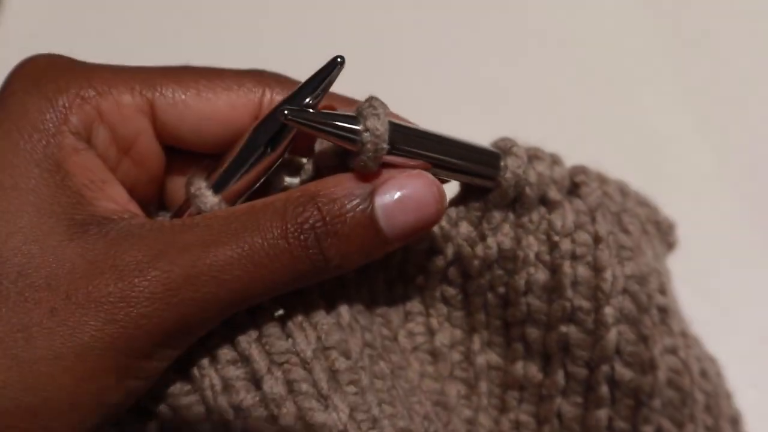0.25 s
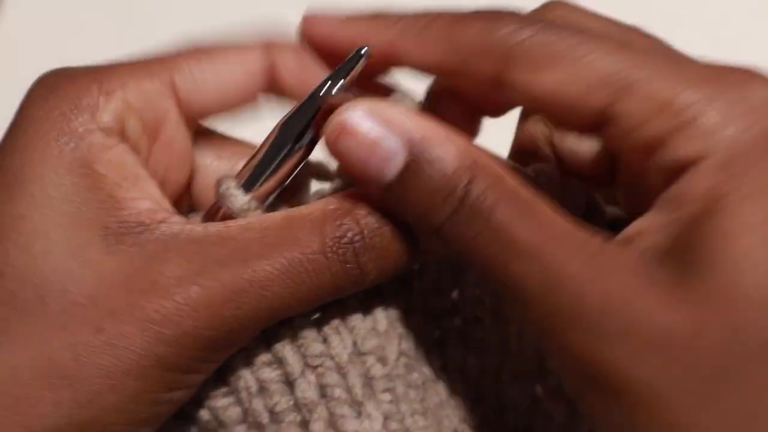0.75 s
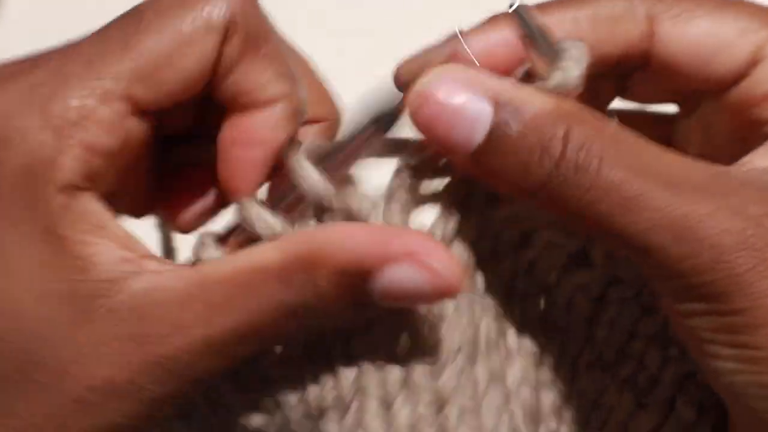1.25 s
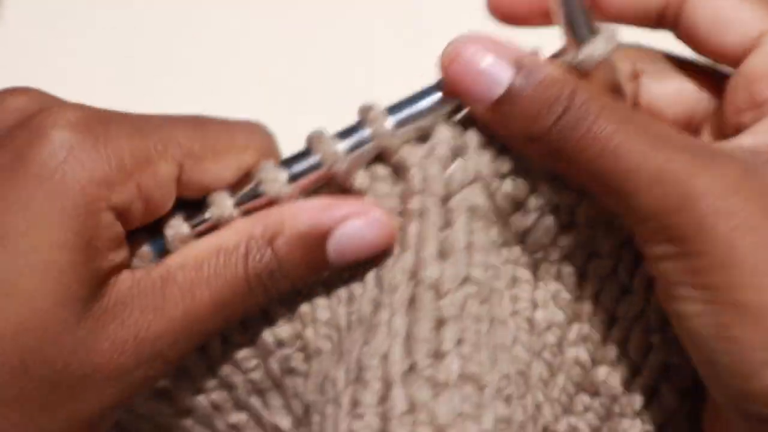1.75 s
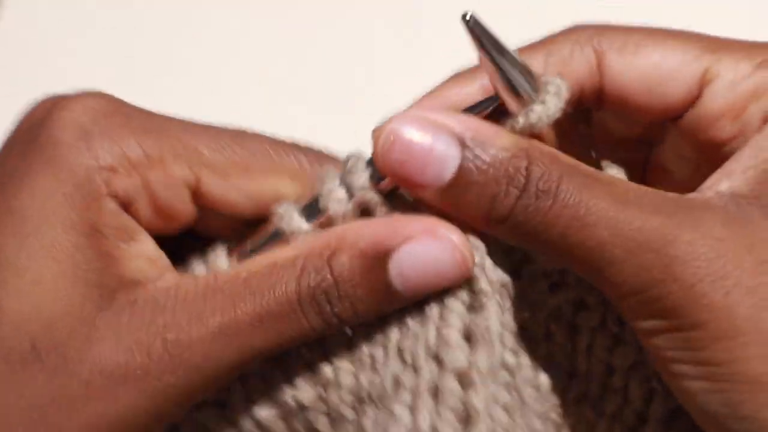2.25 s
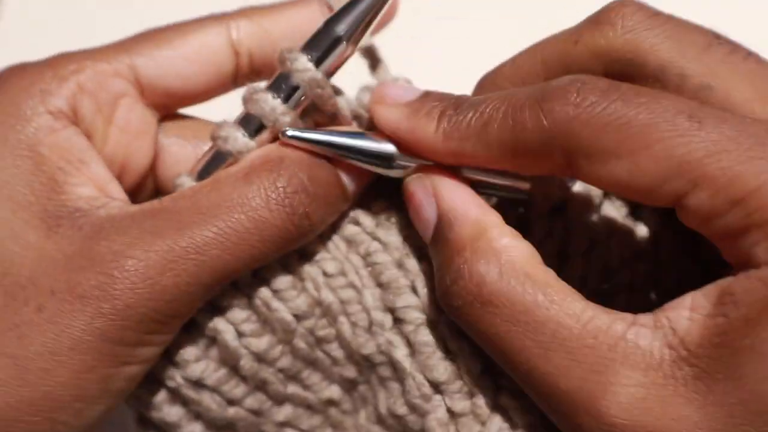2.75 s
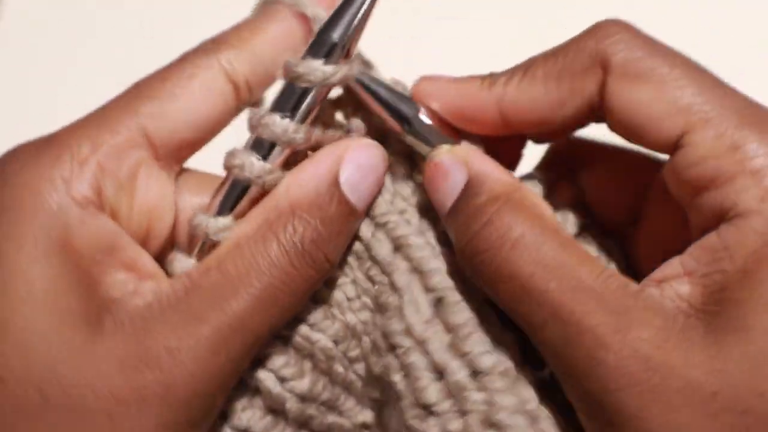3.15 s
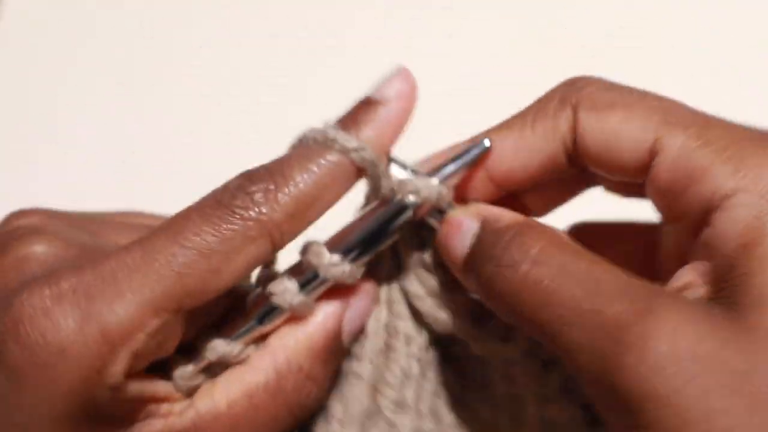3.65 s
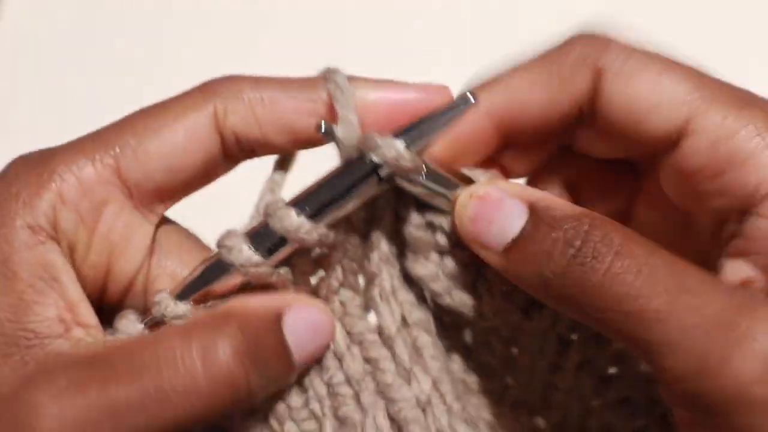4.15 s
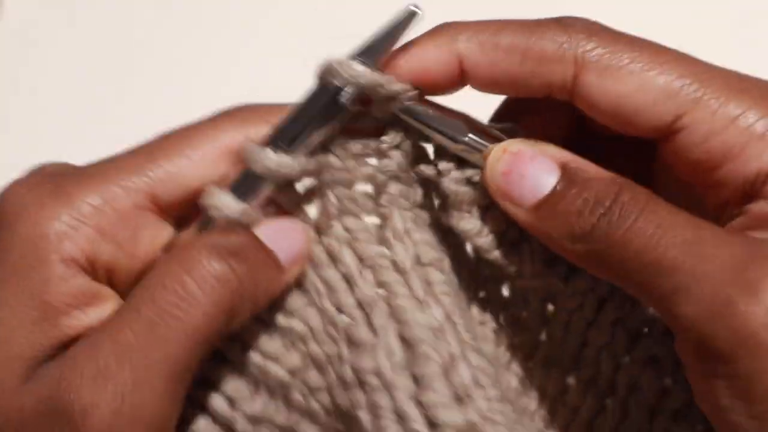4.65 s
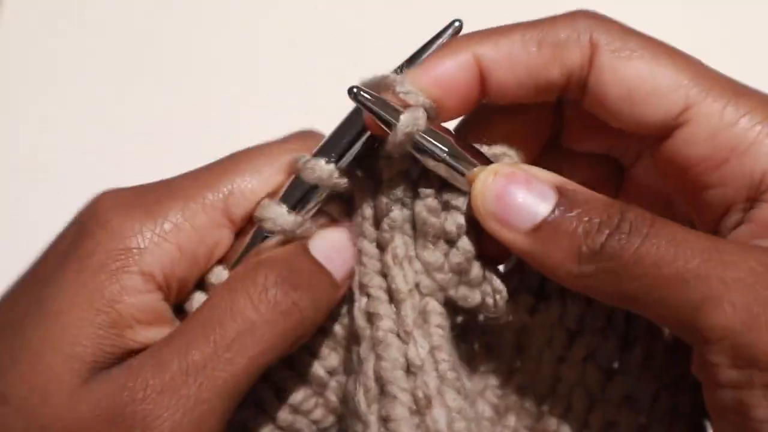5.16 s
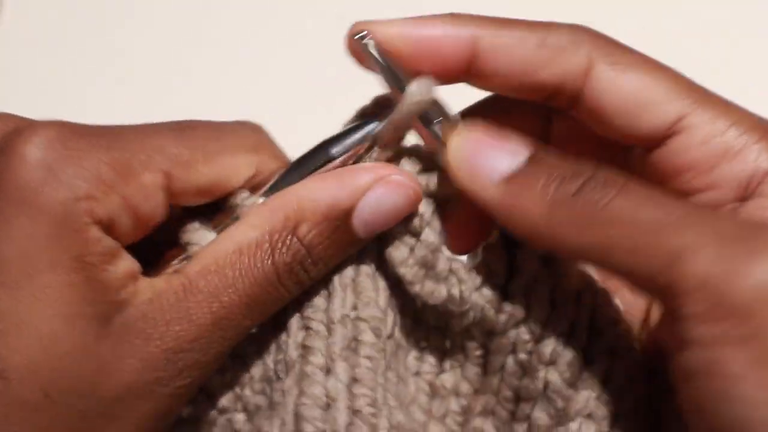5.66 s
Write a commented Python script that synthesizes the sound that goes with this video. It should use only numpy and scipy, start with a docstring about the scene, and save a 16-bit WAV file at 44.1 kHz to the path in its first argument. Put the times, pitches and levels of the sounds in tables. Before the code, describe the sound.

Dull, soft hand thumps and sparse, crisp metal needle clicks, with faint wool rustle, close up in a quiet room with low hiss.

```python
"""Two metal knitting needles cast off stitches, close to a microphone in a quiet room.
Needle contacts are snaps, chatter and damped rings, filtered, echoed by the table and answered by the room.
Hand movements are soft, dull thumps: low decaying pushes, a deep sway and a diffuse rumble.
Scuffs and rustling wool are shaped noise; a steady noise hiss and a low sine hum lie beneath."""
import sys
import numpy as np
from scipy import signal
from scipy.fft import rfft, irfft, next_fast_len
from scipy.io import wavfile
from scipy.ndimage import uniform_filter1d

SR = 44100
rng = np.random.default_rng(int(sys.argv[2]) if len(sys.argv) > 2 else 0)


def dump(signal):
    """Clip the signal to [-1, 1] and save it as 16-bit WAV at the path in sys.argv[1]."""
    limited = np.clip(np.atleast_2d(signal).T, -1, 1)
    pcm = np.round(limited * 32767).astype(np.int16)
    wavfile.write(sys.argv[1], SR, pcm)


N = 259797  # length in samples

# steady hiss: frequency_hz, relative_density_db
HISS_SPECTRUM = [(15, -41), (36, 0), (52, 10.5), (68, -2.5), (110, 1), (170, -8.5), (400, -10), (780, -9.5),
                 (1250, -1), (2400, 1), (4000, -1), (7000, -7.5), (12000, -17), (16000, -30.5)]
HISS_RMS_DB = -63
HUM_HZ, HUM_RMS_DB = 51.4, -87.5

# rustle of the wool fibres: frequency_hz, relative_density_db
WOOL_SPECTRUM = [(300, -15), (1200, -1.5), (3000, -1), (7000, -11), (11500, -17), (13500, -36),
                 (16000, -38)]
# rustle that grows as the knitting gets going: time_s, level_db
HANDLING_LEVELS = [(1.1, -103), (2.0, -71), (3.4, -68.5), (5.89, -64.5)]
# wool brushed by the hands: frequency_hz, relative_density_db
BRUSH_SPECTRUM = [(50, -40), (180, 7), (400, 2), (800, 0), (1800, -0.5), (4500, -13), (8000, -23),
                  (15000, -59)]
# the brush leads the thump and swells this many times slower; its tilt is in dB per octave
BRUSH_LEAD_S, BRUSH_SLOWER, BRUSH_TILT_DB = 0.014, 4.27, 2
# yarn rubs, slides and a needle scrape: strongest_s, level_db, half_length_s, tilt_db_per_octave
RUBS_AND_SLIDES = [(0.068, -64, 0.016, 1), (0.297, -55, 0.0061, 0), (1.201, -74, 0.031, 1),
                   (1.282, -62.5, 0.043, 1), (1.635, -66, 0.13, 5), (2.244, -65.5, 0.048, 3),
                   (3.805, -59, 0.016, -3), (4.325, -65.5, 0.027, 4), (5.316, -60.5, 0.024, 2.5),
                   (5.53, -74, 0.036, 9)]

# bumps of a finger or needle on the fabric: start_s, level_db, centre_hz, spread_octaves, swell_time_s
FABRIC_SCUFFS = [(.048, -61, 2100, 0.26, 0.011), (.066, -56, 480, 0.88, 0.015),
                 (1.123, -46.5, 330, 0.82, 0.021), (3.252, -69, 517, 1, .018),
                 (3.787, -52, 345, 0.62, 0.015), (3.851, -67, 520, .8, 0.014),
                 (5.711, -62.5, 650, 1.5, 0.013), (5.822, -58.5, 577, 0.88, 0.0078)]

# moves of the hands: start_s, level_db, pitch_hz, swell_time_s, change_per_settling_push_db,
# then re level: sway_db, rumble_db, rumble_tilt_db_per_octave, brush_db
HAND_THUMPS = [(.059, -37.5, 114, .011, -18, -7, -1, 3, -22.5),
               (.074, -33.5, 170, 0.0095, -26, -25, -11, -1, -35),
               (.109, -33, 164, 0.014, -30, -14, -20, -13, -29.5),
               (.134, -41.5, 100, .018, -20, -11, -6, -4, -35),
               (.298, -47.5, 127.5, 0.0092, -25, -19, -13.5, -1, -18.5),
               (.336, -55.5, 123, 0.0115, -10, -9, 2, -7, -27),
               (.440, -64.5, 105.5, 0.018, -2.5, 2, -0.5, 2.5, -24),
               (.955, -63.5, 121, .012, -16, -10, -7, -5, -25),
               (1.122, -24.5, 155, 0.012, -19, -45, -31, 1, -36.5),
               (1.143, -26.5, 172.6, .012, -11, -39, -6.5, 0.5, -37.5),
               (1.150, -34, 268.3, 0.013, -12, -35, -11, -6, -31),
               (1.180, -37, 137, 0.012, -9, -28, -6, 0, -25),
               (1.299, -44.5, 146, 0.0065, -25, -24, -21, 9, -23.5),
               (2.166, -64, 143, 0.014, -16, -6, -6.5, 2, -26),
               (2.595, -51, 123.3, 0.018, -3, -5, 1.5, -1.5, -15),
               (2.738, -57, 108, 0.014, -11, -11, 1, -2.5, -38),
               (2.803, -57.5, 111.4, .018, -8, -2, -1.5, -1, -38),
               (3.205, -53.5, 90, 0.02, -9, -1, 7, -13, -10.5),
               (3.252, -55, 130.6, 0.016, -6.5, 5, -1, 3, -15),
               (3.729, -62, 79.6, 0.034, -8, 0, -4, -7, -12),
               (3.782, -37, 117, 0.014, -14, -7, -17, 2, -25),
               (3.798, -38, 106, 0.0086, -14, -24, -11, 3.5, -26),
               (3.835, -45.5, 85, .014, -10, -4, -6, -5, -16.5),
               (3.993, -63.5, 89, 0.0083, -14, -0.5, -6, -10, -20),
               (4.275, -64, 116, 0.02, 4, 1, -1, 2, -8),
               (4.406, -33, 98.6, 0.023, -17, -10, -8, 0.5, -28.5),
               (4.998, -48.5, 83, 0.016, -2.5, 2.5, -2.5, 5, -11),
               (5.030, -45, 89.3, .016, -6, -10, -11, -7, -29), (5.226, -67, 79, 0.023, 0.5, 13, 5, -4, -2),
               (5.587, -41, 70.8, 0.021, -6.5, -14, -2, -3, -22.5),
               (5.821, -63, 147, 0.0085, -10, -2, 0, 2, -2)]
# rumble spectrum: multiple_of_pitch, relative_level_db
RUMBLE_SPECTRUM = [(.2, -26), (.5, -24), (.8, 1), (1, -1.5), (1.8, -14.5), (2.3, -19), (4, -29), (8, -44),
                   (20, -66), (80, -110)]
# hollow resonances of the table and room that colour every rumble: frequency_hz, gain_db
HOLLOW_RESONANCES = [(100, -1.5), (150, 1), (195, 0), (222, 6), (248, -4.5), (280, 5), (330, -3.5),
                     (375, 0.5), (420, -1.5), (465, -0.5), (700, -5)]
SWAY_HZ, SWAY_RISE_S = 56.3, 0.027  # deep sway of the whole piece
SETTLE_SWELLS, SETTLE_PITCH = 2.7, 0.928  # spacing of pushes in swell times; pitch ratio
OVERTONE, OVERTONE_DB = 1.38, -11  # multiple of the pitch; level re the first swing in a taut push
TAUT_HZ, OVERTONE_DB_PER_OCTAVE = 160.6, 16  # the overtone fades below the pitch of a taut push

# needle contacts: start_s, strength_db, lowest_hz, highest_hz, main_ring_db, chatter_t60_s, room_db,
# table_echo_ms, lower_tip_hz, upper_tip_hz, tip_height_db, tip_width_hz
NEEDLE_CONTACTS = [(0.297, -26, 695, 14000, -2, 0.012, -15, 0.83, 6500, 6870, 10, 900),
                   (0.2985, -18.5, 1180, 4000, 0, 0.02, -9, 0.73, 1380, 2500, 7, 620),
                   (0.7351, -13.5, 4120, 11100, -9.5, 0.005, -5.5, 1.6, 4770, 10650, 6, 750),
                   (2.9587, -22.5, 1410, 10800, -14, 0.0044, 0, 0.51, 2160, 5530, 11, 700),
                   (2.9674, -32, 1500, 11900, -12, 0.0038, -5, .55, 5500, 10200, 5, 900),
                   (2.9825, -17, 2900, 11700, -15, 0.0037, -8.5, 1.3, 4400, 10500, 2, 900),
                   (4.7021, -4.5, 1790, 13560, 7.5, 0.0034, -4.5, 0.76, 4020, 4800, 3, 420),
                   (5.141, -31, 1224, 5600, -12, .003, -13, 1.14, 2700, 3300, 9, 600),
                   (5.3200, -39, 700, 12900, 0, .0058, 2, 1, 2500, 5000, 3, 420)]
# bending modes of a needle held in wool and fingers: frequency_hz, relative_level_db, t60_s
NEEDLE_MODES = [(1750, 0, 0.013), (2520, -1.5, 0.011), (3530, 2, .01), (4210, 5, 0.013),
                (4950, 1.5, 0.0092), (6860, -5, 0.014), (7450, 5, 0.0071), (7960, 10.5, 0.0078),
                (8920, 9, 0.009), (9160, 5, 0.013), (10000, 2, 0.012), (10500, -9, 0.013),
                (12600, 2, 0.0056)]
# colour of steel ticking on steel: frequency_hz, gain_db
STEEL_COLOUR = [(200, -4.5), (700, -0.5), (1200, -4), (2000, -5), (12600, 0), (13500, -13), (15000, -7),
                (16500, 1)]
# the table echo is duller than the click: frequency_hz, gain_db
TABLE_ECHO_COLOUR = [(4000, -6), (12000, -13.5)]
# slip of a needle tip: start_s, peak_db, pitch_hz, swell_time_s
TIP_SQUEAK = (4.9965, -47, 3150, .0015)
MAIN_RING_HZ, MAIN_RING_OCTAVES = 7800, 0.37  # region whose level depends on where the needles meet
LOW_SLOPE, HIGH_SLOPE = 5.3, 18  # filter orders at the edges of a contact's band
BEND_LAG_MS = 1.4  # travel time of a 1 kHz bending wave; higher ones are faster
ROOM_RIPPLE = 0.55  # share of the ripple between rings left when heard from all sides

# decay of the room: frequency_hz, t60_s
ROOM_DECAY = [(200, 0.78), (2000, 0.22), (5000, 0.28), (9000, 0.17), (14000, 0.18)]
EDGE_HZ = 16000  # upper band limit


def gain_of(db):
    """Logarithmic level: decibels become an amplitude ratio."""
    return 10 ** (np.asarray(db) / 20)


def evened(x):
    """Mean power: a signal is scaled to an rms of one."""
    return x / np.sqrt(np.mean(x ** 2) + 1e-20)


def read(points, hz):
    """Logarithmic frequency: table values are interpolated along octaves."""
    f, value = np.transpose(points)
    return np.interp(np.log(hz + 1e-6), np.log(f), value)


def tilted(spectrum, db_per_octave):
    """Spectral tilt: levels change by a fixed number of decibels per octave."""
    return [(hz, level + db_per_octave * np.log2(hz)) for hz, level in spectrum]


def add(mix, start_s, sound):
    """Superposition: a sound adds to the mix, in place, from its start."""
    part = mix[max(round(start_s * SR), 0):][:len(sound)]
    part += sound[:len(part)]


def noise(spectrum, size):
    """Filtered noise: a random signal of rms one takes the given spectrum."""
    length = next_fast_len(size)
    hz = np.fft.rfftfreq(length, 1 / SR)
    white = rfft(rng.standard_normal(length))
    coloured = irfft(white * gain_of(read(spectrum, hz)), length)
    return evened(coloured[:size])


def swell(t, rise):
    """Smooth impulse envelope: a push peaks at one at the time rise and dies away."""
    return (t / rise * np.exp(1 - t / rise)) ** 2


def causal(db, size):
    """Minimum phase: the log gain alone fixes the most compact causal impulse response."""
    log_gain = np.log(gain_of(np.r_[db, db[-2:0:-1]]))
    response = np.exp(np.conj(signal.hilbert(log_gain)))
    return np.fft.ifft(response).real[:size]


def delayed(x, ms):
    """Phase delay: a phase turn shifts all frequencies alike or each by its own time."""
    hz = np.fft.rfftfreq(len(x), 1 / SR)
    return irfft(rfft(x) * np.exp(-2j * np.pi * hz * ms / 1000), len(x))


def room(x, wet_db, dry=True, first_echo_s=0.0051, early_db=4, early_time_s=0.008, size=10240):
    """Reverberation: nearby surfaces answer after a few milliseconds; the bass lingers longest."""
    time = np.arange(size) / SR
    hz, t, bands = signal.stft(rng.standard_normal(size), SR, nperseg=256)
    decay = gain_of(-60 * t / read(ROOM_DECAY, hz)[:, None])
    tail = signal.istft(bands * decay, SR, nperseg=256)[1][:size]
    tail *= gain_of(early_db * swell(time, early_time_s))  # early reflections crowd together
    out = np.pad(x, (0, size)) * dry
    answer = signal.fftconvolve(x, tail / np.linalg.norm(tail))
    add(out, first_echo_s, gain_of(wet_db) * answer)
    return out


def background():
    """Stationary sound: coloured noise hisses over one faint, low sine."""
    hum = np.sqrt(2) * np.sin(2 * np.pi * HUM_HZ * np.arange(N) / SR)
    return gain_of(HISS_RMS_DB) * noise(HISS_SPECTRUM, N) + gain_of(HUM_RMS_DB) * hum


def wool(grain_db=1.5, size=20000):
    """Stick-slip friction: catch and release gives grainy rustles, brushes, rubs, slides and a scrape."""
    time = np.arange(N) / SR
    handling_db = np.interp(time, *np.transpose(HANDLING_LEVELS))
    rustle = gain_of(handling_db) * noise(WOOL_SPECTRUM, N)
    for start_s, db, _, rise, *_, brush_db in HAND_THUMPS:
        grain = noise(tilted(BRUSH_SPECTRUM, BRUSH_TILT_DB), size)
        brush = swell(time[:size], BRUSH_SLOWER * rise) * grain
        add(rustle, start_s - BRUSH_LEAD_S, gain_of(db + brush_db) * brush)
    for strongest_s, db, half_s, tilt_db in RUBS_AND_SLIDES:
        envelope = np.exp(-((time - strongest_s) / half_s) ** 2)
        rustle += gain_of(db) * envelope * noise(tilted(WOOL_SPECTRUM, tilt_db), N)
    flicker = evened(uniform_filter1d(rng.standard_normal(N), size=90))
    catches = evened(gain_of(grain_db * flicker))
    return catches * rustle


def scuffs(wet_db=-8, size=8192):
    """Broadband impact: a bump on the fabric is a short puff of noise, which the room answers."""
    out, t = np.zeros(N), np.arange(size) / SR
    hz = np.geomspace(20, 20000, num=60)
    for start_s, db, centre_hz, octaves, rise in FABRIC_SCUFFS:
        # a bell-shaped band on the octave axis
        band_db = -10 * np.log10(np.e) * (np.log2(hz / centre_hz) / octaves) ** 2
        puff = gain_of(db) * swell(t, rise) * noise(np.c_[hz, band_db], size)
        add(out, start_s, room(puff, wet_db))
    return out


def push(t, db, hz, rise):
    """Damped oscillation: a few low cycles, with a stronger overtone when taut and high."""
    turn = 2 * np.pi * hz * t
    slack_octaves = min(np.log2(hz / TAUT_HZ), 0)
    overtone_gain = gain_of(OVERTONE_DB + OVERTONE_DB_PER_OCTAVE * slack_octaves)
    overtone = overtone_gain * np.sin(OVERTONE * turn)
    return gain_of(db) * swell(t, rise) * (np.sin(turn) + overtone)


def thumps(rumble_t60_s=0.33, rumble_rise_s=0.0067, count=3, size=16384):
    """Damped settling: lower, mostly weaker pushes follow each move, with a sway and diffuse rumble."""
    out, t = np.zeros(N), np.arange(size) / SR
    bins = np.fft.rfftfreq(size, 1 / SR)[1:]
    envelope = (1 - np.exp(-t / rumble_rise_s)) ** 2 * gain_of(-60 * t / rumble_t60_s)
    envelope_rms = np.sqrt(np.mean(envelope ** 2))
    sway = swell(t, SWAY_RISE_S) * np.sin(2 * np.pi * SWAY_HZ * t)
    for start_s, db, hz, rise, change_db, sway_db, rumble_db, tilt_db, _ in HAND_THUMPS:
        for k in range(count):
            settling = push(t, db + k * change_db, hz * SETTLE_PITCH ** k, rise)
            add(out, start_s + k * SETTLE_SWELLS * rise, settling)
        shape = [(ratio * hz, level) for ratio, level in tilted(RUMBLE_SPECTRUM, tilt_db)]
        colour = np.c_[bins, read(shape, bins) + read(HOLLOW_RESONANCES, bins)]
        rumble = evened(noise(colour, size) * envelope) * envelope_rms
        add(out, start_s, gain_of(db + sway_db) * sway + gain_of(db + rumble_db) * rumble)
    return out


def contact_colour(hz, low_hz, high_hz, main_db):
    """Contact filtering: a blow excites one band; its place raises or lowers the main ring."""
    low_edge = 1 + (low_hz / (hz + low_hz / 10)) ** (2 * LOW_SLOPE)
    high_edge = 1 + (hz / high_hz) ** (2 * HIGH_SLOPE)
    octaves = np.log2((hz + 1) / MAIN_RING_HZ)
    main_ring = main_db * np.exp(-(octaves / MAIN_RING_OCTAVES) ** 2)
    return main_ring - 10 * np.log10(low_edge * high_edge)


def needles(ring_db=0, chatter_db=-8, chatter_rise_s=0.00031, knock_db=-10, size=2048):
    """Modal impact: steel meets steel in a dry snap, brief chatter and rings damped by fingers and wool."""
    out, t, hz = np.zeros(N), np.arange(size) / SR, np.fft.rfftfreq(size, 1 / SR)
    # all bending modes start together, which leaves gaps between their rings
    ring = sum(gain_of(db - 60 * t / t60) * np.cos(2 * np.pi * f * t) for f, db, t60 in NEEDLE_MODES)
    snap = signal.unit_impulse(size) + gain_of(ring_db) * ring / np.linalg.norm(ring)
    bend_ms = BEND_LAG_MS * np.sqrt(1000 / (hz + 1))
    steel_db = read(STEEL_COLOUR, hz)
    echo_filter = causal(read(TABLE_ECHO_COLOUR, hz), size)
    for start_s, db, low_hz, high_hz, main_db, t60, wet_db, echo_ms, *tips_hz, tip_db, width_hz in NEEDLE_CONTACTS:
        chatter = rng.standard_normal(size) * gain_of(-60 * t / t60)
        chatter *= 1 - np.exp(-t / chatter_rise_s)
        contact = snap + gain_of(chatter_db) * chatter / np.linalg.norm(chatter)
        # place and force set the broad colour; rings and chatter give only the fine ripple
        power = abs(rfft(contact)) ** 2
        broad_db = 10 * np.log10(uniform_filter1d(power, size=101))
        # outside its band a contact still knocks faintly, the more the harder it is
        tone_db = db + np.maximum(contact_colour(hz, low_hz, high_hz, main_db), knock_db + db)
        # two resonances of the free tips stand out; they move as the grip changes
        tone_db = tone_db + sum(tip_db / (1 + (2 * (hz - f) / width_hz) ** 2) for f in tips_hz)
        click = signal.fftconvolve(contact, causal(steel_db + tone_db - broad_db, size))[:size]
        click = delayed(click, bend_ms)
        add(out, start_s, click)
        add(out, start_s, signal.fftconvolve(delayed(click, echo_ms), echo_filter))
        ripple_db = ROOM_RIPPLE * (10 * np.log10(power) - broad_db)
        radiated = causal(steel_db + tone_db + ripple_db, size)
        add(out, start_s, room(radiated, wet_db, dry=False))
    start_s, db, squeak_hz, rise = TIP_SQUEAK
    add(out, start_s, gain_of(db) * swell(t, rise) * np.sin(2 * np.pi * squeak_hz * t))
    return out


def scene():
    """Superposition: hands, needles, wool and background add in one channel."""
    return (thumps() + scuffs() + needles() + wool() + background())[None]


def record(dry):
    """Band limitation: a linear-phase low-pass filter removes the highest treble."""
    lowpass = signal.firwin(511, EDGE_HZ, window=("kaiser", 9), fs=SR)
    return signal.oaconvolve(dry, lowpass[None], "same")


dry = scene()
out = record(dry)
dump(out)
```